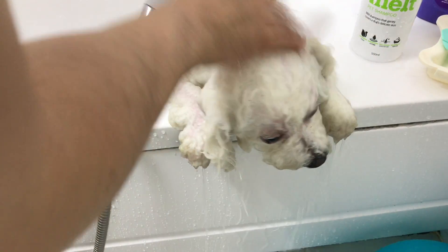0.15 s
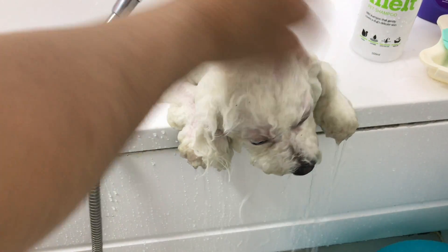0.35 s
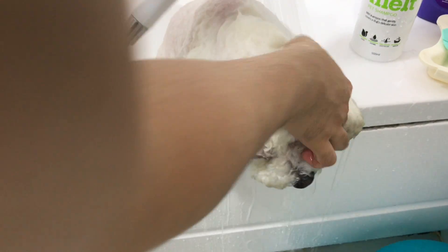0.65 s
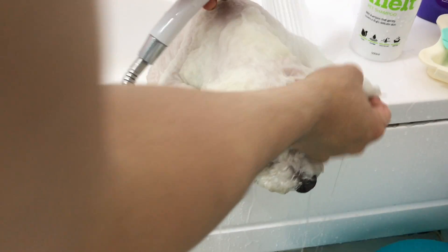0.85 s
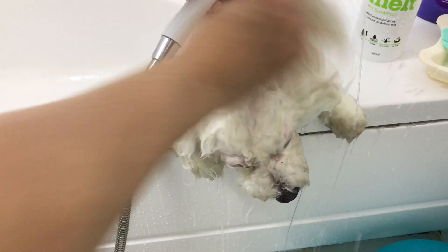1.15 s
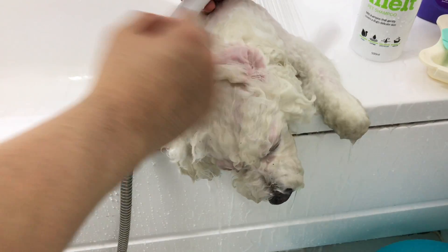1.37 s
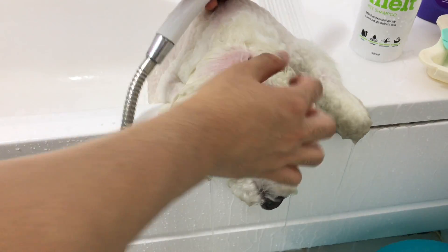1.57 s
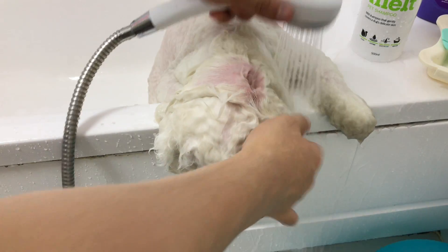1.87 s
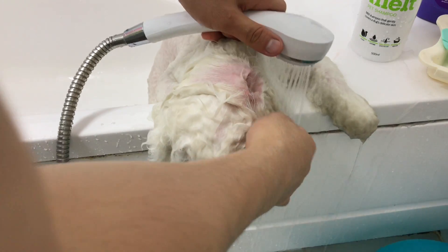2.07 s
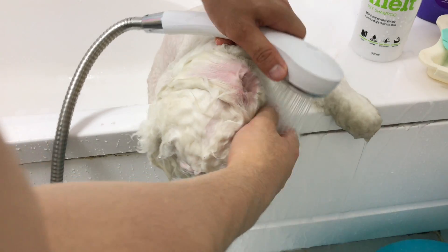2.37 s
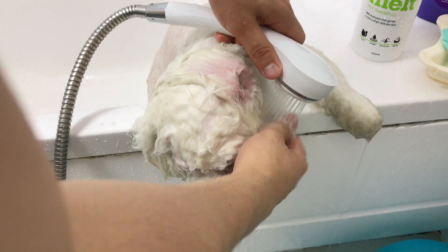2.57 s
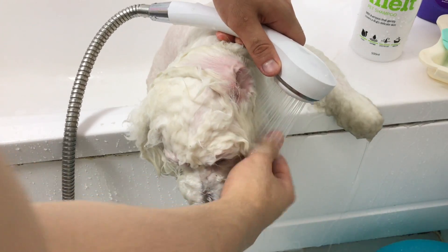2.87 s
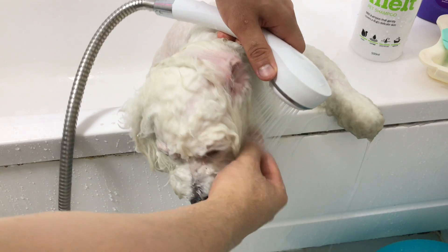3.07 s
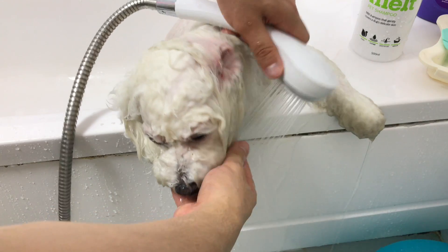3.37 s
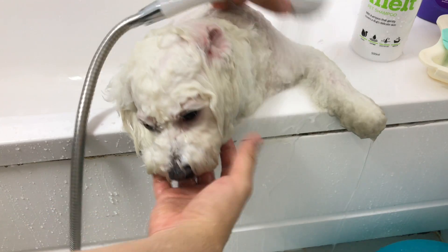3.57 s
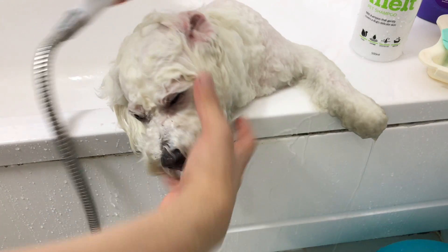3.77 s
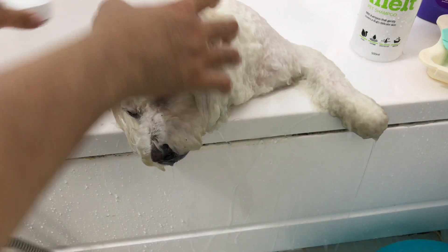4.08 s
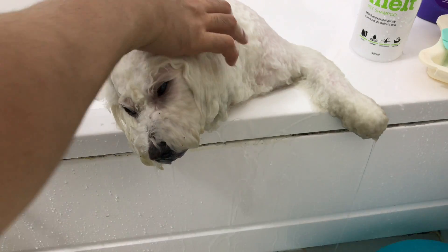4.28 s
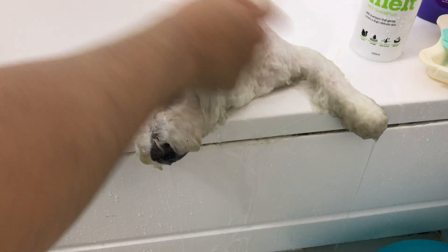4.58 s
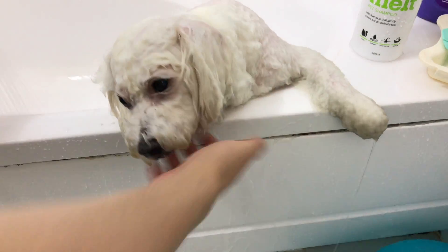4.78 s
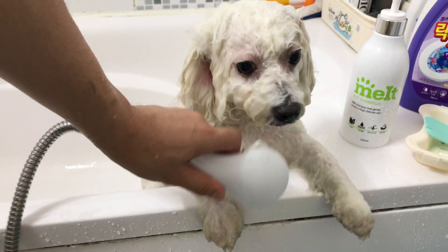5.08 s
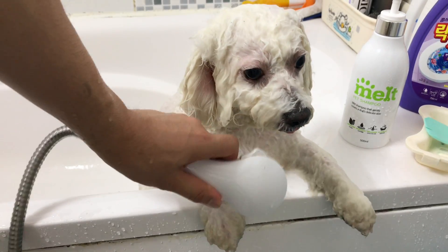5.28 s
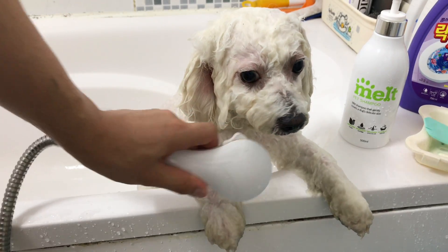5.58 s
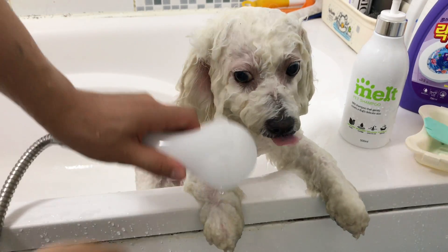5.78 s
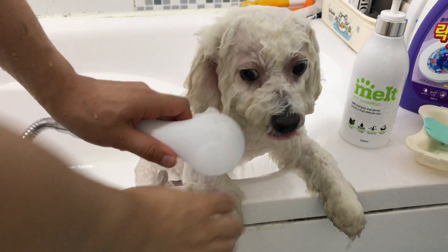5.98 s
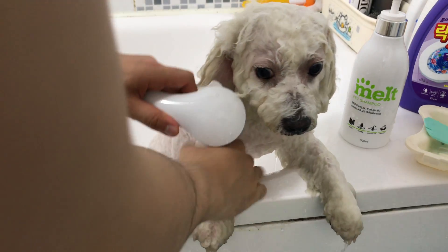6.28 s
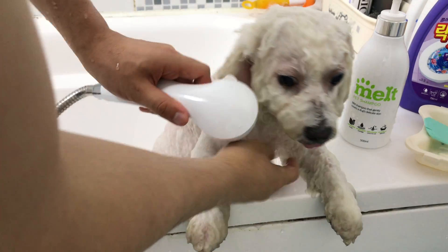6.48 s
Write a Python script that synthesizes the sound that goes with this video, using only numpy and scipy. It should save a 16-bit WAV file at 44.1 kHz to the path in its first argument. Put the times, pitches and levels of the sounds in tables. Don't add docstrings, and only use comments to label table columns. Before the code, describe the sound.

A hand-held shower fizzes and drums on wet fur and tub, water slapping down in splashes, with a brief fade before a closer, hoarser spray.

```python
import sys
import numpy as np
from scipy import signal
from scipy.fft import rfft, irfft
from scipy.io import wavfile
from scipy.ndimage import uniform_filter1d

SR = 44100
rng = np.random.default_rng(int(sys.argv[2]) if len(sys.argv) > 2 else 0)


def gain_from_db(level_db):
    decades = np.asarray(level_db, float) / 20
    return 10 ** decades


def wav_record(signal):
    frames = np.transpose(np.atleast_2d(signal))
    bounded = np.clip(frames, -1, 1)
    quanta = np.round(bounded * 32767).astype(np.int16)
    wavfile.write(sys.argv[1], SR, quanta)


N = 292824

CUT_S = 4.875
FADE_OUT_S, FADE_IN_S = (4.755, 4.869), (4.885, 5.045)
# f/Hz, density/dB per Hz
SHARED_COLOUR = [(200, -39), (400, -25), (700, -12.5), (1100, -3.5), (1700, -1), (4300, 0.5), (4950, -3.5),
                 (6600, 0), (7700, -3.5), (9700, -2), (10450, -6), (11200, -2), (15600, 0.5), (22000, 7)]


def spray():
    # f/Hz, level/dB
    close_colour = [(500, 0.5), (900, 2), (2000, 1.5), (2950, 1.5), (3300, -2), (4300, 0), (5000, 1),
                    (7000, 1)]
    # f/Hz, level/dB
    unevenness = [(400, 1.05), (2000, 0.96), (5000, 1.33), (12000, 1.2)]
    spray_db, gust_db, drops_db = -0.64, 0.3, -17
    hz, t, z = signal.stft(rng.standard_normal(N), SR, nperseg=512, noverlap=384)
    patches = blotches(z.shape, 8, 24) + 0.8 * blotches(z.shape, 3, 8)
    head_close = (t > CUT_S) | (abs(t - 1.5) < 0.55)
    gusts = evened(uniform_filter1d(rng.standard_normal(len(t)), size=24))
    field_db = read(SHARED_COLOUR, hz)[:, None] + water_db(hz[:, None], t) + spray_db
    field_db = field_db + read(close_colour, hz)[:, None] * head_close
    field_db = field_db + read(unevenness, hz)[:, None] * patches + gust_db * gusts
    jets = signal.istft(z * gain_from_db(field_db), SR, nperseg=512, noverlap=384)[1][:N]
    spatter_db = water_db(5000, np.arange(N) / SR) - 8
    return jets + gain_from_db(spatter_db + drops_db) * drops()


def water_db(hz, t):
    # t/s, level/dB
    nozzle = [(0.0, -15), (0.24, -19), (0.32, -21.5), (0.64, -20.5), (0.72, -16), (1.02, -16), (1.08, -19),
              (1.92, -16.5), (2.08, -18), (2.24, -14), (3.6, -14), (3.68, -12), (4.0, -21.5), (4.24, -28.5),
              (4.48, -17), (4.76, -21), (5.05, -17.5), (6.64, -17.5)]
    # t/s, level/dB, pitch/octaves above 1 kHz
    strike = [(0.0, -17.5, 1.5), (0.56, -22, 2), (0.72, -15, 0.19), (0.96, -23.5, 0.9), (1.2, -15.5, 0.17),
              (1.84, -19, 0.3), (2.0, -18.5, 1.2), (2.16, -21.5, 0.26), (2.32, -13.5, 0.78),
              (3.44, -11, 0.88), (3.52, -15, 2.16), (3.84, -18.5, 1.3), (4.0, -16.5, 2.2),
              (4.16, -29.5, 3.0), (4.76, -19, 3.2), (5.05, -12.5, 0.45), (5.95, -15, 0.96),
              (6.64, -15.5, 0.59)]
    # t/s, level/dB
    gurgle = [(0.0, -15), (0.08, -12), (0.64, -23.5), (0.88, -7.5), (1.2, -20), (1.84, -13), (2.15, -13),
              (2.75, -23), (3.36, -14), (3.55, -25), (3.7, -13.5), (3.95, -23), (5.35, -26), (5.5, -31),
              (5.95, -9.5), (6.25, -23), (6.64, -17)]
    octave = np.log2(np.maximum(hz, 500) / 1000)
    (hiss_db,) = along(nozzle, t)
    strike_db, pitch = along(strike, t)
    (gurgle_db,) = along(gurgle, t)
    hiss_db = hiss_db + 2.5 * (octave - 3.5)
    strike_db = strike_db - 3 * (octave - pitch) ** 2
    gurgle_db = gurgle_db - 9.5 * octave
    return 10 * np.log10(gain_from_db(2 * hiss_db) + gain_from_db(2 * strike_db) + gain_from_db(2 * gurgle_db))


def along(table, t):
    held = np.where(t < CUT_S, np.minimum(t, FADE_OUT_S[0]), np.maximum(t, FADE_IN_S[1]))
    times, *columns = np.transpose(table)
    return [np.interp(held, times, column) for column in columns]


def drops():
    drops_per_s, spread_db = 700, 3.5
    size = gain_from_db(spread_db * np.minimum(rng.exponential(1, N), 5))
    size = size * (rng.random(N) < drops_per_s / SR)
    kind = rng.integers(0, 16, N)
    t, out = np.arange(1024) / SR, np.zeros(N)
    for k, hz in enumerate(np.geomspace(900, 14000, num=16)):
        cycles = hz * t
        ring_cycles = (2.4, 9.0)[k % 2]
        blip = np.sin(2 * np.pi * (cycles + 0.0036 * cycles ** 2)) * np.exp(-cycles / ring_cycles)
        out += signal.oaconvolve(size * (kind == k), blip / np.linalg.norm(blip))[:N]
    return evened(out)


def run_off():
    # t/s, peak
    # level/dB, centre f/Hz, splash level after it/dB
    impacts = [(0.0544, -9, 7200, -12), (0.0938, -1, 5800, -17), (0.1184, -14, 5530, -16),
               (0.13, -4, 6240, -13), (0.1718, -4.5, 7430, -14), (0.1853, -5.5, 3540, -17),
               (0.2085, -12, 2630, -25), (0.222, -4, 2900, -20), (0.239, -7, 2850, -18),
               (0.356, -7.5, 6350, -9), (0.369, 0.5, 2500, -20), (0.4603, -0.5, 7500, -10),
               (0.5423, -13, 3800, -23), (0.5622, -4, 6300, -14), (0.607, -8.5, 2900, -22),
               (0.7118, -21, 8500, -15), (0.7283, -1, 5070, -14), (0.835, -12, 5950, -16),
               (3.9387, 1, 2900, -11.5), (3.9899, -10.5, 2590, -10), (4.032, -8.5, 3600, -12),
               (4.053, -6, 13000, -17), (4.061, -6, 6490, -20), (4.0906, -13, 6530, -13),
               (4.195, -19, 14000, -16), (4.249, -17, 6300, -16), (4.5076, -23.5, 2700, -1),
               (5.045, -7, 13000, -11), (6.012, -19, 2800, -6),
               (2.1555, -6, 6900, -11), (2.2044, -5, 6100, -9), (2.3185, -2.5, 6370, -18),
               (2.3994, -3, 5880, -12), (2.5112, -4, 2400, -20), (2.5762, -5.5, 6740, -12),
               (2.6227, 0.5, 3560, -23), (2.7381, 3, 4470, -24), (2.8938, 1, 5950, -24),
               (2.9077, -5, 6200, -6), (2.916, 3, 3800, -16), (2.939, -4, 5310, -9), (3.0382, -4, 3900, -8),
               (3.048, -3, 4200, -8), (3.0995, -3.5, 4500, -18), (3.139, -7, 5030, -20),
               (3.17, -5, 4530, -14), (3.1892, -9, 3900, -13), (3.262, -5, 3420, -21),
               (3.3253, 1.5, 2680, -18), (3.43, -5, 3600, -28), (3.4894, -8.5, 6080, -5),
               (3.6042, -2.5, 4300, -12), (3.69, -9, 5930, -2), (3.7444, -9, 6000, -13),
               (3.7988, -4, 5620, -11.5), (3.8336, -5.5, 2800, -13)]
    out = np.zeros(N)
    for s, *blow in impacts:
        add(out, s + 0.00054, slap(*blow))
    return coloured(out, SHARED_COLOUR)


def slap(db, hz, splash_db):
    crack_t60, splash_t60 = 0.0077, 0.17
    crack_rise, splash_rise = 0.00061, 0.0046
    clump_db = 2.4
    t = np.arange(SR // 6) / SR
    treble_db = -15 + 2 * np.log2(hz / 3000)
    noise, sputter = rng.standard_normal((2, len(t)))
    colour = evened(resonate(noise, hz, 1.09 * hz))
    colour = colour + gain_from_db(treble_db) * evened(resonate(noise, 11500, 5000))
    colour = signal.sosfilt(signal.butter(3, 0.65 * hz, "high", fs=SR, output="sos"), colour)
    crack = gain_from_db(-60 * t / crack_t60) * np.minimum(t / crack_rise, 1)
    clumps = gain_from_db(clump_db * evened(uniform_filter1d(sputter, size=90)))
    tail = gain_from_db(splash_db - 60 * t / splash_t60) * clumps
    tail = tail * np.minimum(t / splash_rise, 1) * (1 - t / t[-1])
    return gain_from_db(db) * colour * (crack + tail) / abs(colour * crack).max()


def squelches():
    # t of the peak/s, rms level/dB, centre f/Hz, width/Hz, length/s
    squeezes = [(0.702, -30, 1210, 150, 0.017), (0.875, -27.5, 800, 350, 0.11), (1.419, -30, 980, 300, .14),
                (1.76, -31, 2140, 600, 0.085), (2.48, -25.5, 2160, 500, 0.11), (6.47, -32, 1110, 400, 0.15),
                (1.989, -24.5, 1940, 700, 0.076), (4.226, -34.5, 1690, 500, 0.07),
                (4.295, -38, 1200, 150, 0.025), (5.665, -36, 380, 200, 0.022),
                (5.969, -30.5, 1030, 700, 0.077)]
    out = np.zeros(N)
    for s, db, hz, width, length in squeezes:
        count = round(2 * length * SR)
        noise = rng.standard_normal(count)
        add(out, s - length, gain_from_db(db) * evened(resonate(noise, hz, width)) * np.hanning(count))
    return out


def pocket():
    # t/s, level/dB
    whistle = [(4.9, -43), (5.2, -39), (5.5, -34), (5.8, -29.5), (6.15, -34), (6.3, -55), (6.64, -58)]
    # f/Hz, width/Hz, level/dB
    cavity = [
        (2347, 160, -1.5),
        (2720, 68, -0.077),
    ]
    t, noise = np.arange(N) / SR, rng.standard_normal(N)
    wander = uniform_filter1d(uniform_filter1d(rng.standard_normal(N), size=1500), size=1500)
    throb = gain_from_db(evened(wander))
    modes = sum(gain_from_db(db) * evened(resonate(noise, hz, width)) for hz, width, db in cavity)
    times, level_db = np.transpose(whistle)
    return gain_from_db(np.interp(t, times, level_db, left=-90)) * throb * modes


def tub():
    # middle t/s, length/s, hum level/dB, rumble level/dB
    swells = [(0.0, 0.36, -47, -72), (0.224, 0.15, -43, -52), (0.435, 0.46, -47.5, -49.5),
              (0.79, 0.32, -48, -48), (1.003, .3, -70, -61), (1.5, 0.32, -58, -62),
              (1.913, 0.41, -34, -43.5), (2.543, 0.77, -47, -49.5), (3.228, .2, -41.5, -55),
              (3.52, 0.061, -54, -69), (3.815, 0.36, -42, -49), (4.295, 1, -58, -52),
              (4.65, 0.58, -53, -57), (4.988, 0.13, -44, -61), (5.45, 0.86, -58, -56),
              (5.69, 0.27, -54, -50), (5.94, 0.61, -67, -48), (6.133, 0.24, -39.5, -50),
              (6.283, .15, -57, -52), (6.43, 0.55, -36.5, -46)]
    # t/s, level/dB, f/Hz, T60/s
    knocks = [
        (0.204, -29, 237, 0.13),
        (0.753, -14, 260, 0.073),
        (0.79, -22, 233.4, 0.21),
    ]
    # f/Hz, density/dB per Hz
    rumble_colour = [(20, -30), (40, -35), (60, 2.5), (100, -2), (170, 0), (230, 1.5), (300, -4.5),
                     (420, -7), (600, -10), (1000, -60)]
    rumble_db, drain_db = -1, -56.5
    hum_steady = 0.3
    hum, roll = np.full(N, gain_from_db(-60)), np.full(N, gain_from_db(-54.5))
    for s, length, swell_hum_db, swell_rumble_db in swells:
        arch = np.cos(np.pi * np.clip((np.arange(N) / SR - s) / length, -0.5, 0.5)) ** 2
        hum += gain_from_db(swell_hum_db) * arch
        roll += gain_from_db(swell_rumble_db) * arch
    mode = resonate(rng.standard_normal(N), 229, 20)
    flutter = uniform_filter1d(abs(mode), size=400) + 1e-9
    out = hum * evened(mode / flutter ** hum_steady)
    t = np.arange(SR // 4) / SR
    for s, db, hz, t60 in knocks:
        onset = np.minimum(t / 0.0083, 1) ** 2
        add(out, s, gain_from_db(db - 60 * t / t60) * np.sin(2 * np.pi * hz * t) * onset)
    rumble = evened(coloured(rng.standard_normal(N), rumble_colour))
    drain = evened(resonate(rng.standard_normal(N), 513, 630))
    return out + gain_from_db(rumble_db) * roll * rumble + gain_from_db(drain_db) * drain


def bathroom(x):
    # f/Hz, T60/s
    reverberation = [(200, 0.87), (1000, 0.56), (4000, 0.53), (12000, 0.44)]
    taps = np.zeros(SR)
    at = np.arange(200, SR - 20, 20)
    taps[at + rng.integers(0, 20, len(at))] = rng.choice([-1., 1.], len(at))
    hz, t, z = signal.stft(taps, SR, nperseg=256)
    decay = gain_from_db(-60 * t / read(reverberation, hz)[:, None])
    tail = signal.istft(z * decay, SR, nperseg=256)[1]
    return signal.fftconvolve(x, tail / np.linalg.norm(tail))[:N]


def ringing(x):
    # f/Hz, width/Hz, level/dB
    basin = [(60.7, 8.6, -5), (73, 8.8, -4), (138, 12, -3), (204, 12, -10.5), (269, 11, 1.5),
             (327.4, 25, 6.5), (407.5, 8.1, 2), (545.8, 7.8, 5), (620, 16, -2.5), (715, 25, -4.5),
             (932, 8.3, -7), (1057, 8.3, -0.5), (1624, 12, -6), (2206, 30, -8)]
    hz = np.fft.rfftfreq(2 ** 19, 1 / SR)
    gain = 1 + sum(gain_from_db(db) / (1 + 2j * (hz - f) / width) for f, width, db in basin)
    return irfft(rfft(x, 2 ** 19) * gain)[:len(x)]


def evened(x):
    return x / np.sqrt(np.mean(x ** 2) + 1e-20)


def read(points, hz):
    f, value = np.transpose(points)
    return np.interp(np.log(hz + 1), np.log(f + 1), value)


def coloured(x, spectrum):
    hz = np.fft.rfftfreq(2 ** 19, 1 / SR)
    return irfft(rfft(x, 2 ** 19) * gain_from_db(read(spectrum, hz)))[:len(x)]


def resonate(x, hz, width):
    turn = np.exp(2j * np.pi * hz * np.arange(len(x)) / SR)
    r = np.exp(-np.pi * width / SR)
    once = signal.lfilter([1 - r], [1, -r], x / turn)
    return 2 * (turn * signal.lfilter([1 - r], [1, -r], once)).real


def blotches(shape, bins, frames):
    field = rng.standard_normal(shape)
    return evened(uniform_filter1d(uniform_filter1d(field, bins, axis=0), frames, axis=1))


def add(mix, s, sound):
    part = mix[round(s * SR):][:len(sound)]
    part += sound[:len(part)]


def fader():
    floor = 0.12
    t = np.arange(N) / SR
    down = np.interp(t, FADE_OUT_S, (1, 0)) ** 1.37
    up = np.interp(t, FADE_IN_S, (0, 1)) ** 1.52
    return (floor + (1 - floor) * down) * (t < FADE_OUT_S[1]) + up


def scattered_treble(mid):
    patch_times = [.853, .955, 1.051, 1.463, 1.533, 1.556, 1.649, 1.811, 1.933, 2.65, 2.807, 2.975, 3.024,
                   3.779, 4.464, 4.592, 5.268, 5.291, 5.808, 6.15, 6.173, 6.24]
    band_edges = [4200, 5200, 5700, 6900, 8300, 9700, 11000, 12400, 13800, 14500, 15850]
    side_db, share = -4, 0.3
    side, bins = np.zeros(N), np.arange(1024) + 0.5
    window = signal.windows.kaiser_bessel_derived(2048, 4 * np.pi)
    tones = np.cos(np.pi / 1024 * np.outer(np.arange(2048) + 512.5, bins)) / np.sqrt(512)
    tones = window[:, None] * tones
    band = np.searchsorted(band_edges, bins * SR / 2048)
    for s in patch_times:
        start = 35 + 1024 * round((s * SR - 35) / 1024 - 1)
        lost = np.r_[0, rng.random(len(band_edges) - 1) < share, 0][band]
        level = np.sqrt(uniform_filter1d((mid[start:start + 2048] @ tones) ** 2, size=20))
        noise = gain_from_db(side_db) * level * lost * rng.standard_normal(1024)
        add(side, start / SR, tones @ noise)
    return side


def scene():
    room_db = -10
    near = run_off() + squelches()
    mono = ringing(spray() + tub()) + pocket() + near + gain_from_db(room_db) * bathroom(near)
    return np.array([mono, mono])


def roll_off(x):
    return signal.sosfilt(signal.butter(12, 15850, fs=SR, output="sos"), x)


def record(dry):
    low_cut = signal.butter(2, 30, "high", fs=SR, output="sos")
    faded = signal.sosfilt(low_cut, dry[0] * fader())
    high_cut = signal.firwin(1023, 15760, window=("kaiser", 10), fs=SR)
    mid = signal.oaconvolve(faded, high_cut, "same")
    side = scattered_treble(mid)
    both = np.clip([mid + side, mid - side], -1, 1)
    return roll_off(both)


dry = scene()
out = record(dry)
wav_record(out)
```